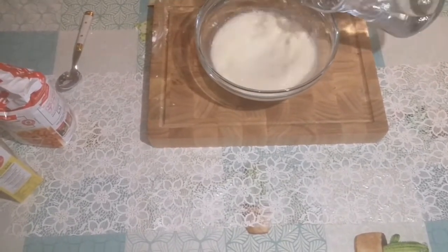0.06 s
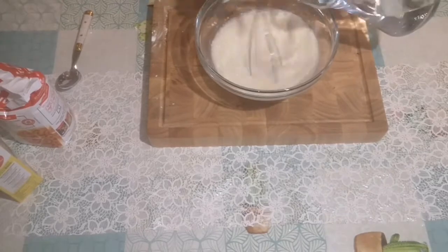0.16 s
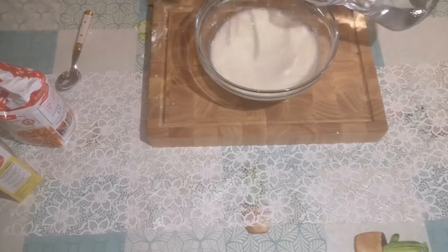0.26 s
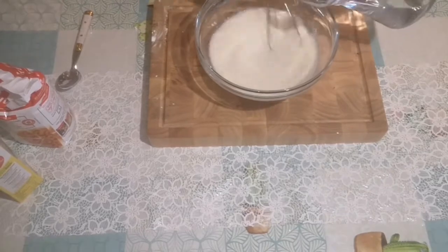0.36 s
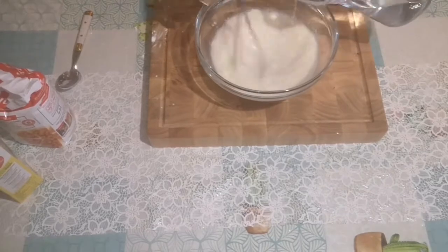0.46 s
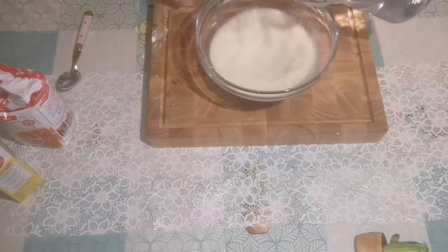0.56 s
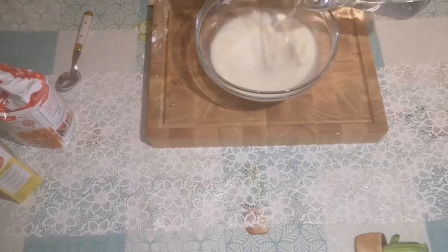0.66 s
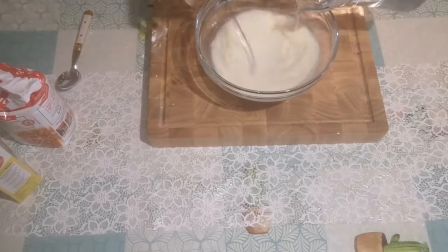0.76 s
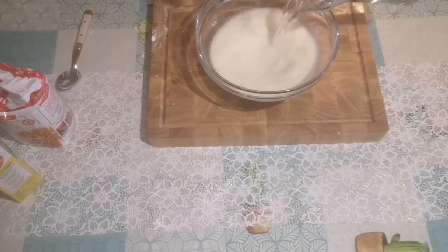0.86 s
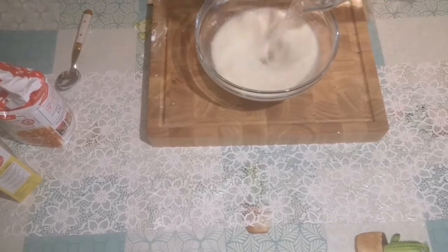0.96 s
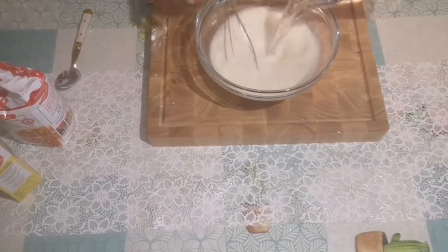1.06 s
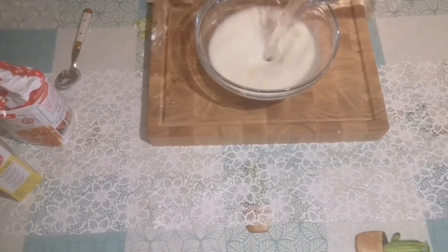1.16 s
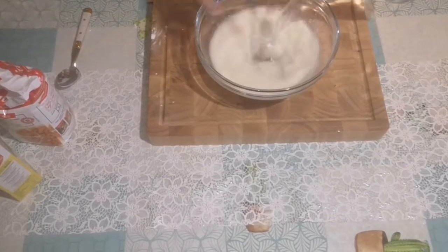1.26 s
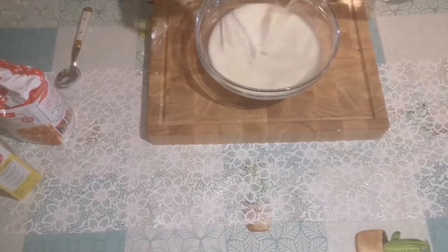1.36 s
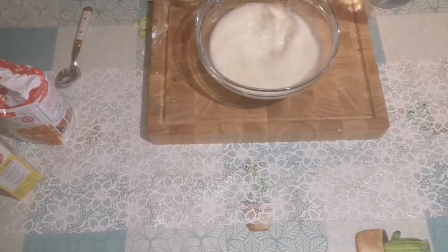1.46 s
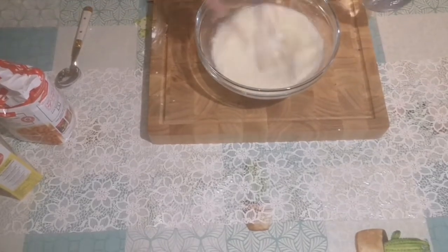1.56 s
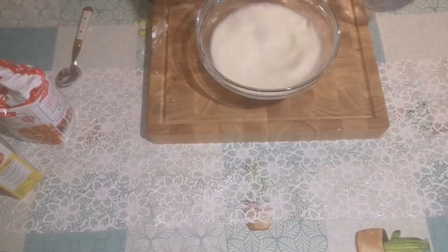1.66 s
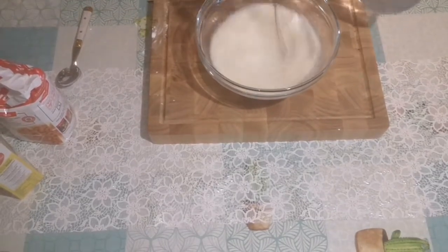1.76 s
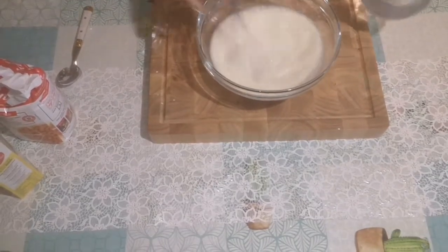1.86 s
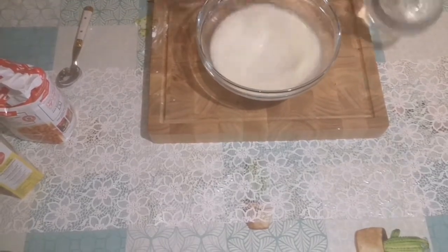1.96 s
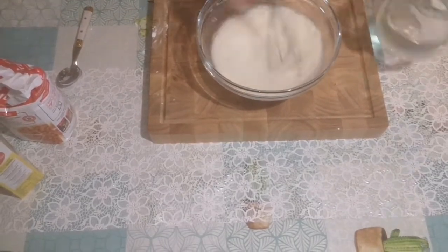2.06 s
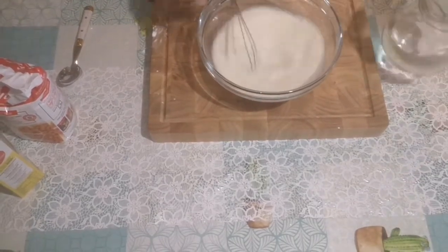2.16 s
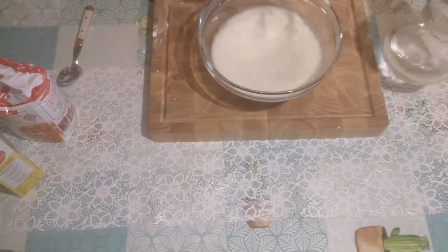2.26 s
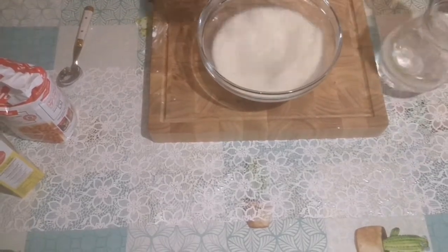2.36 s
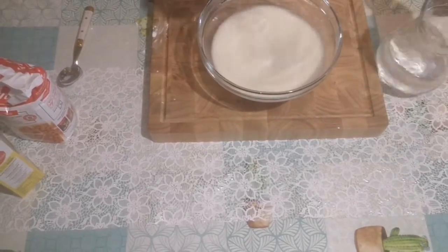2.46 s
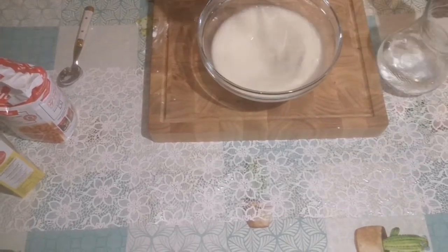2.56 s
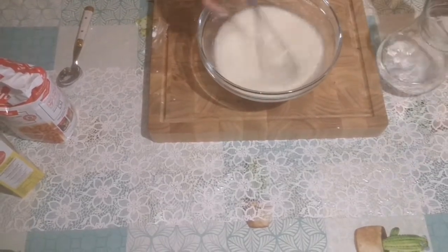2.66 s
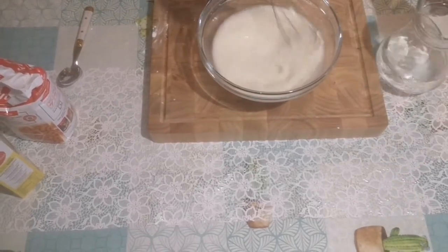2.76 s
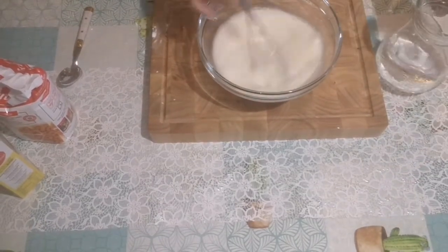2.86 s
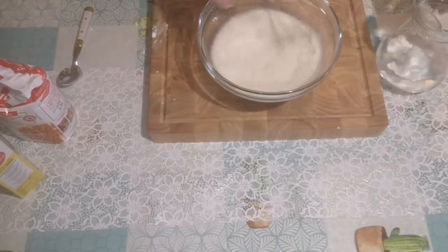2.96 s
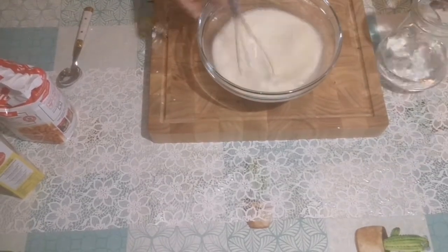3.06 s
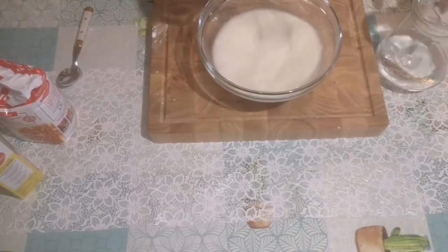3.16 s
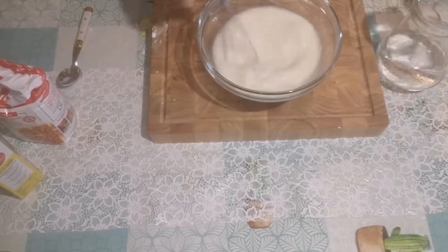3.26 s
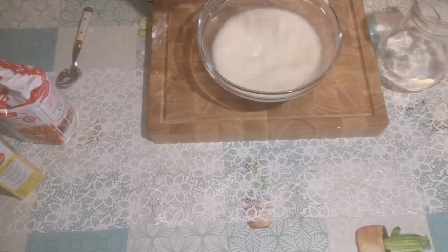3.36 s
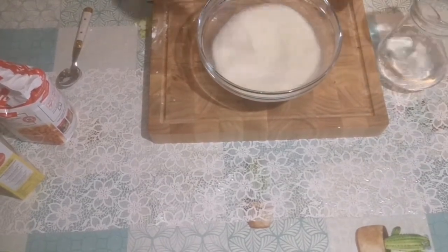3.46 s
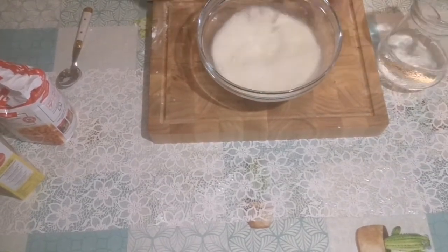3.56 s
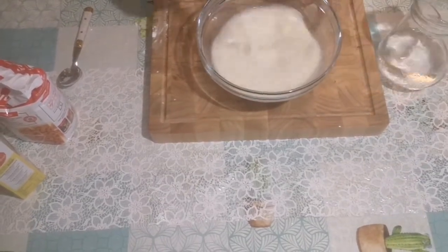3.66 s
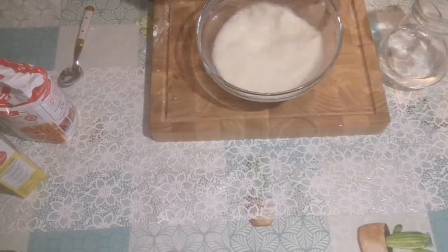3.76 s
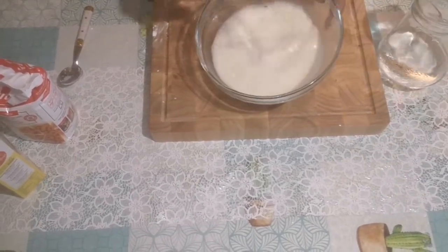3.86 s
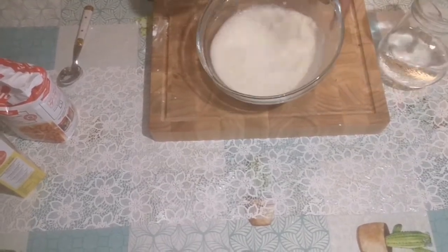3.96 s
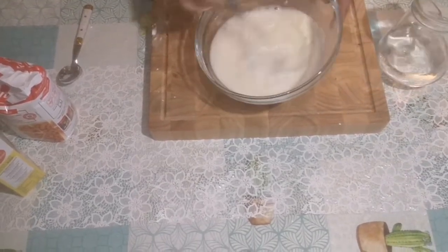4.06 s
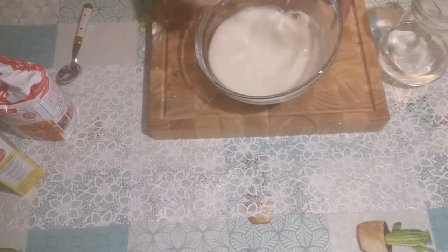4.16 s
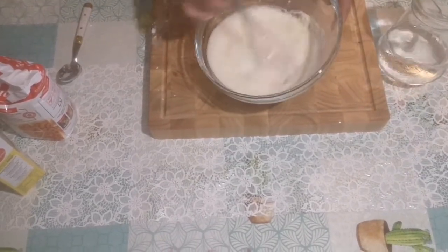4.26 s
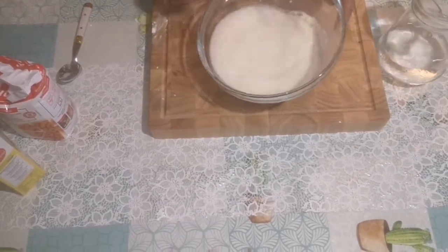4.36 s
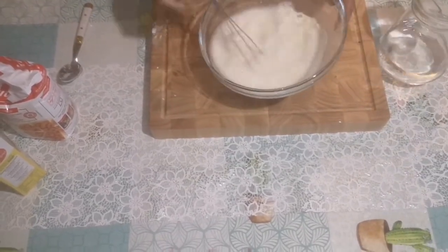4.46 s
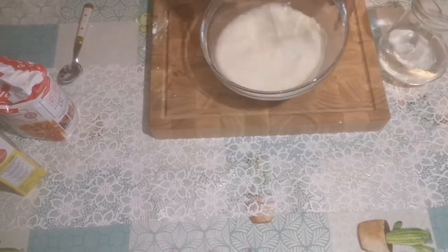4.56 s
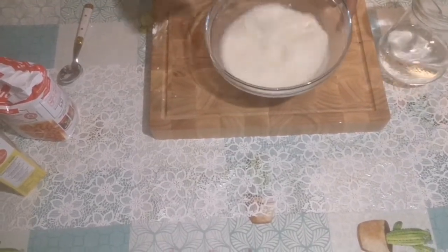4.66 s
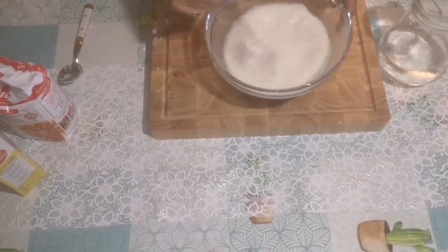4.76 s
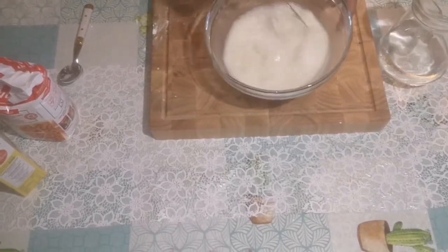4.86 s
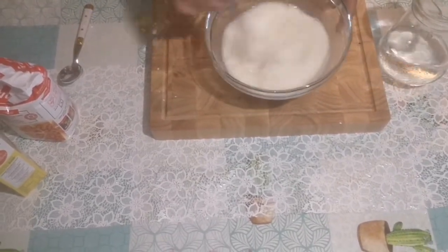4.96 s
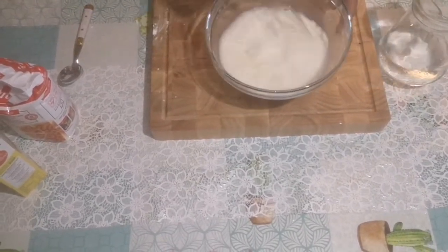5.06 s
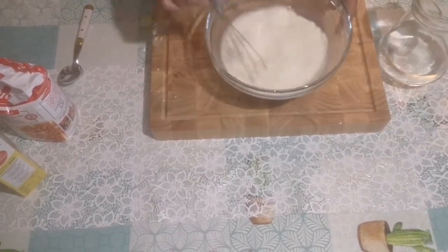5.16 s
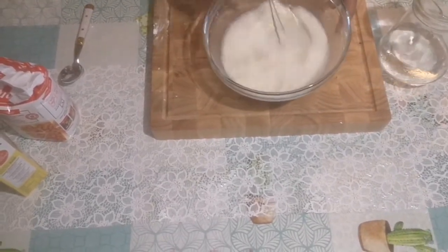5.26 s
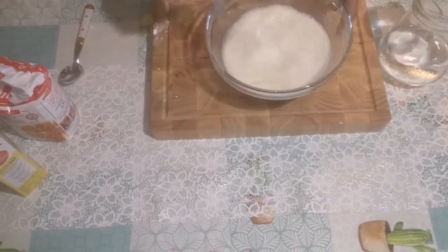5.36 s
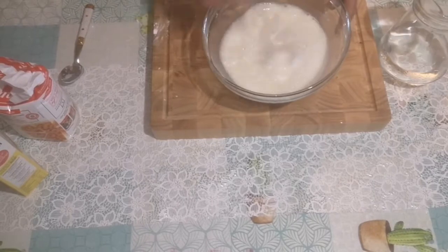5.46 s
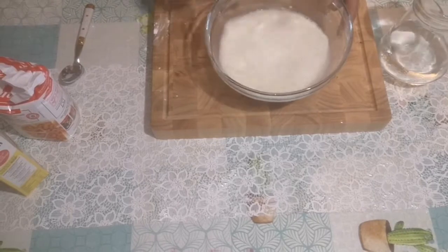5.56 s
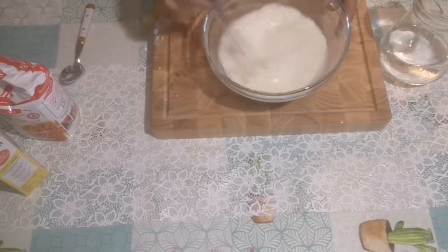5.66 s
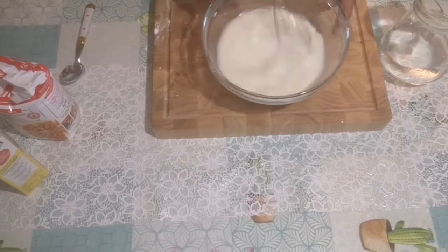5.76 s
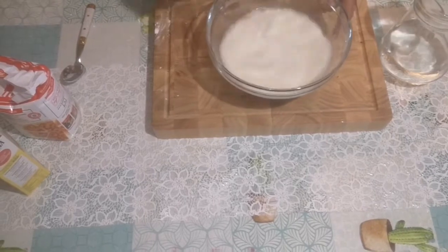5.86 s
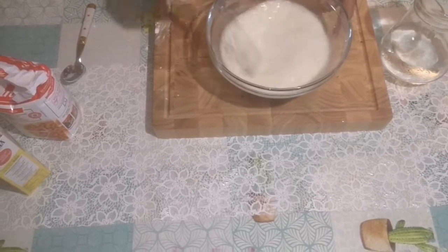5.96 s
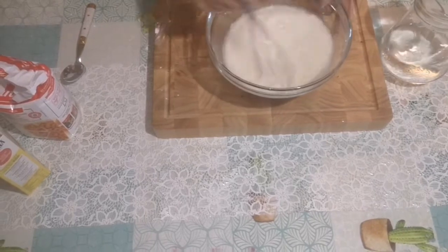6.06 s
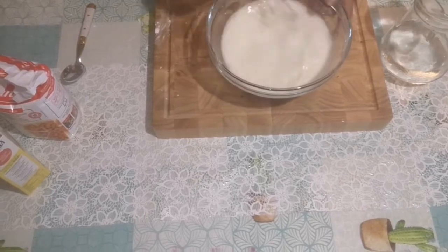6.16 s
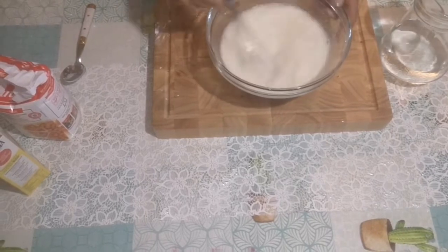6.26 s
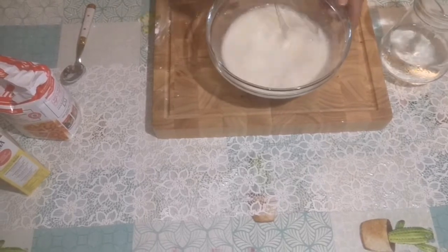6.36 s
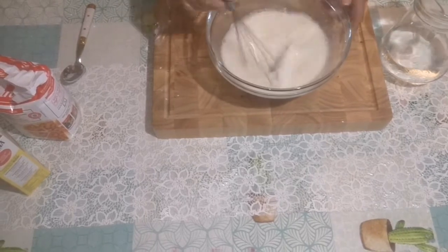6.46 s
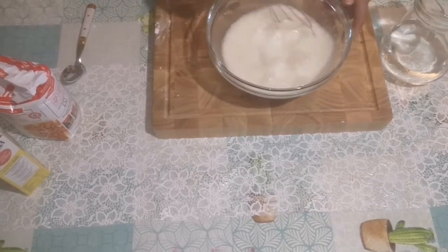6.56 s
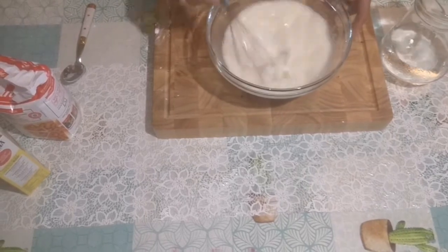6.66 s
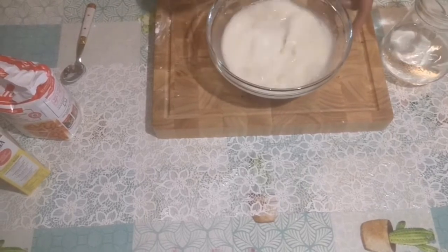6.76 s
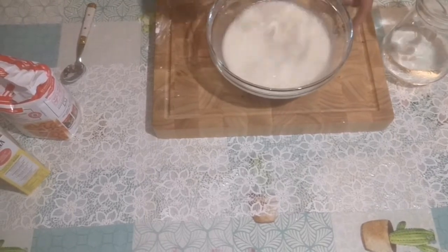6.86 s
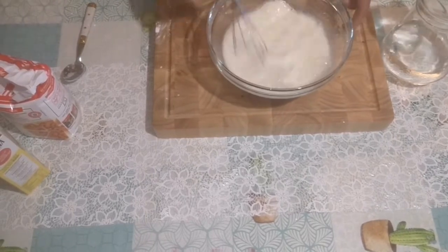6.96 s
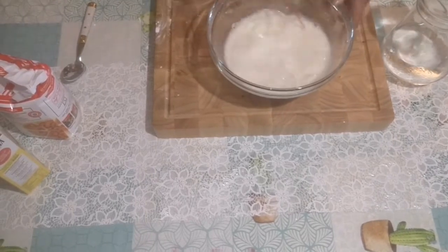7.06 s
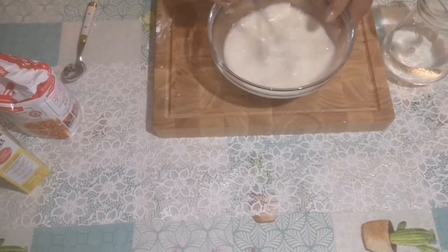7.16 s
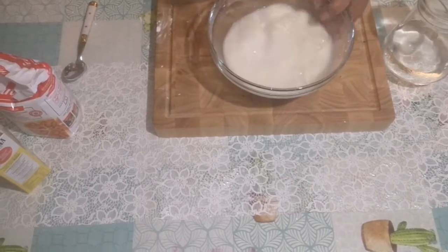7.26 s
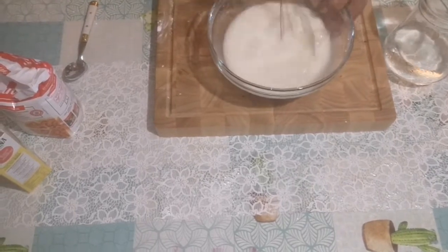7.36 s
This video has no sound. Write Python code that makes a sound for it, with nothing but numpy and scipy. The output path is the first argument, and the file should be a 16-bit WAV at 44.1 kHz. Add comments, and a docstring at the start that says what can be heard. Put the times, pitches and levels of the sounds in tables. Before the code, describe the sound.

Close up in a quiet kitchen, a steel whisk starts softly against a glass bowl, then liquid is poured and the batter sloshes. A jug lands on the table with a double boom. Stirring grows into brisk bright slaps, froth and plops; a clattering board knock follows a lull, then the whisking becomes vigorous. A phone on the table picks up the low thumps and a faint hum.

```python
"""Whisking batter in a glass bowl

Wires scrape, sing and slap on glass: gritty noise under stroke envelopes, with ringing modes.
Poured water and batter slosh, froth and plop as noise and short gliding sines, as does a handle knock.
The whisk clinks on a jug and rings the rim; the jug is set down and the bowl knocked on a wooden board,
as struck modes and clatter. A phone on the table hears the thumps, over a quiet kitchen with a faint hum."""
import sys
import numpy as np
from scipy import signal
from scipy.fft import rfft, irfft, next_fast_len
from scipy.io import wavfile
from scipy.ndimage import uniform_filter1d

SR = 44100
rng = np.random.default_rng(int(sys.argv[2]) if len(sys.argv) > 2 else 0)


def master_out(mix):
    """Clip the mix to full scale and print it as 16-bit PCM to the path in sys.argv[1]."""
    frames = np.transpose(np.atleast_2d(mix))
    ceiling = np.clip(frames, -1, 1)
    pcm = np.round(ceiling * 32767).astype(np.int16)
    wavfile.write(sys.argv[1], SR, pcm)


N = 327214

# whisk sweeping round the bowl: crest_s, scrape_db, slosh_minus_scrape_db, fall_s (to -60 dB)
SWEEPS = [(0.01, -44.5, -1, .12), (0.066, -45.5, 3, .21), (0.24, -51, 4, 0.5), (0.352, -57, 2.5, 0.2),
          (0.89, -44, 8, .3), (1.057, -39, 4.5, .15), (1.19, -37.5, 2, 0.4), (1.342, -38, 3, 0.15),
          (1.505, -38, -2, 0.2), (1.648, -45, 3.5, 0.4), (1.81, -42, -1, .12), (1.935, -44, 2, .12),
          (2.062, -37, -2.5, 0.2), (2.205, -39, 0.5, 0.1), (2.463, -35, -11, 0.5), (2.615, -39, 6, 0.3),
          (2.815, -48.5, 7.5, .6), (3.015, -37, 2.5, .32), (3.125, -48, 6, .3), (3.235, -40, 3.5, 0.6),
          (3.4, -38.5, 3, 0.5), (3.61, -35.5, -2, 0.27), (3.855, -31.5, 1, 0.07), (3.931, -43, 8, .11),
          (4.044, -37, 4.5, 0.36), (4.225, -40, 4, .3), (4.369, -46, 9.5, 0.2), (4.47, -47, 7, .2),
          (4.622, -36.5, 4, 0.3), (4.702, -44, 4, .3), (4.859, -40, 0, .26), (4.941, -44, 5.5, .19),
          (5.175, -42.5, 4, .14), (5.345, -42, -1.5, 0.2), (5.66, -52, 6, 0.5), (6.048, -33.5, 0.5, 0.3),
          (6.17, -46, 6, .3), (6.278, -33, 1.5, 0.16), (6.488, -29.5, 0, .09), (6.57, -37, 3, .12),
          (6.685, -33.5, 5.5, 0.2), (6.786, -37.5, -0.5, 0.1), (6.822, -31, 1, 0.3), (6.949, -41, 5.5, 0.6),
          (7.333, -39.5, -0.5, .18)]
# wires slapping the glass, sudden and bright: crest_s, scrape_db, slosh_minus_scrape_db
SLAPS = [(0.515, -43, -5.5), (0.929, -33, -3.5), (1.376, -37.5, 2.5), (1.755, -37.5, -6.5),
         (1.976, -44.5, 3), (2.35, -36.5, -2), (2.952, -37, 0), (3.159, -26, -7), (3.352, -23.5, -6.5),
         (3.528, -44, 9), (3.555, -21, -9), (3.731, -42.5, 6), (3.766, -29.5, -4), (3.968, -36.5, 1.5),
         (4.16, -28, -6.5), (4.403, -46, 9), (5.079, -36.5, -2), (5.396, -36, -1), (5.545, -50, 5.5),
         (5.967, -28.5, -7), (6.202, -24.5, -6.5), (6.359, -34.5, 3), (6.398, -29.5, 1),
         (6.604, -27.5, -2.5), (7.079, -35.5, 2), (7.224, -39, -1.5)]
# poured water and batter swirling on between strokes: time_s, slosh_db
WASH = [(0, -66), (.8, -64), (.86, -45), (1.2, -41), (1.5, -44), (1.6, -57), (2.3, -60), (2.6, -50),
        (3.49, -60), (4.0, -46), (5.2, -51), (5.6, -58), (5.95, -62), (6.4, -46), (7.42, -60)]
# colour of the bright rasp: freq_hz, level_db
SCRAPE = [(2000, -28), (3700, 2), (7000, 7.5), (10300, -17.5), (14600, -12.5), (16000, -67)]
# colour of the wet rattle: freq_hz, level_db
SLOSH = [(300, -36.5), (600, -18), (770, -11), (950, -11), (1420, -0.5), (3400, 0.5), (4700, -5),
         (5800, -5.5), (8000, -42.5)]
# singing modes of the whisk wires: pitch_hz, level_db
WIRES = [(3820, -6), (5500, -1.5), (5850, 3.5), (6390, -6), (6870, -2.5), (7550, -3), (9170, -18)]
# hollows of the filled bowl: pitch_hz, level_db
FILLED = [(1200, 0.5), (1420, 0), (1800, 1), (2560, 1.5), (3300, -5.5)]
# deepest hollow, which sounds more as batter climbs the wall: time_s, level_db
HOLLOW_LEVEL = [(.8, -72), (.88, -57), (1.3, -54), (1.7, -70), (2.5, -64), (3.6, -54), (5.3, -54),
                (5.7, -62), (6.6, -50), (7.42, -60)]
# how hard the stirring arm loads the table: time_s, level_db
LOAD = [(0, -60), (.8, -70.5), (1.0, -55), (1.45, -51), (1.65, -58), (2.05, -50.5), (2.3, -68),
        (2.7, -56.5), (3.0, -50), (3.6, -54.5), (4.2, -53), (4.5, -56), (5.2, -51.5), (5.7, -64),
        (6.0, -47.5), (6.9, -52.5), (7.42, -60)]
# modes of the table, lowest first: pitch_hz, level_db, t60_s (after a knock)
TABLE = [(32.4, -8.5, 0.69), (57.2, -19, 1), (94.1, 1, 0.47), (125, -1, 0.26), (158.4, -9, 0.38),
         (198, -1, 0.13), (265, -2.5, 0.17), (297.7, -6, 0.36), (357.7, -8.5, 0.41)]
# room tone colour: freq_hz, level_db
KITCHEN = [(20, 6.5), (110, 0), (200, -12.5), (390, -3), (510, -18.5), (700, -43), (1350, -12), (2600, -11),
           (7300, -20), (15000, -58)]
# kitchen hum: pitch_hz, t60_s, level_db
HUM = (372, 0.15, -66)
# air pockets in the batter, and near 6.6 s the whisk handle knocking: start_s, level_db, pitch_hz
POPS = [(0.515, -38, 1264), (0.661, -38.5, 1280), (2.182, -29, 1836), (2.338, -30.5, 2130),
        (2.614, -27, 780), (3.157, -25, 1430), (3.522, -27, 1610), (3.759, -24, 2260), (3.839, -29, 1220),
        (3.85, -21, 2590), (3.906, -32, 1980), (3.93, -31, 784), (4.032, -28, 2510), (4.058, -28, 2800),
        (4.397, -19, 1363), (4.884, -29.5, 780), (5.051, -32, 1126), (5.075, -24, 1360), (5.113, -32, 790),
        (6.263, -27, 860), (6.358, -25, 1890), (6.407, -30, 800), (6.464, -29.5, 790), (6.485, -28, 2350),
        (6.548, -31, 775), (6.6045, -10, 1660), (6.6105, -11, 1450), (6.622, -20, 1503), (6.661, -30, 805),
        (6.686, -23, 1250), (6.807, -32, 830), (6.849, -32, 740), (7.074, -32.5, 737), (7.3, -31.5, 1190)]
# one wire alone on dry glass: start_s, level_db
TICKS = [(0.8935, -27), (0.9239, -22.5), (1.0854, -29), (1.1382, -26), (4.339, -27)]
# whisk touching the jug: start_s, level_db
CLINK = [(1.3683, -26)]
# modes of the jug: pitch_hz, level_db, t60_s
JUG = [(2920, 3.5, 0.1), (2992, 0, 0.28), (3020, -4, 0.42), (3180, 0, .1)]
# blows on the table top: start_s, level_db, clatter_db (against the blow), clatter_t60_s
KNOCKS = [(2.338, -36, -7, .1), (2.378, -9.5, 0, 0.34), (2.41, -33, 0, 0.24), (2.468, -13.5, -18, 0.36),
          (5.747, -40, 6, 0.22), (5.7705, -14, 8, 0.16), (5.806, -14, 14.5, 0.26)]
# colour of things rattling on the table: freq_hz, level_db
CLATTER = [(200, -13), (370, -4), (520, -12), (780, -3), (1100, 1), (2500, -6), (4000, -16), (9000, -55)]
# modes of the wooden board: pitch_hz, level_db, t60_s
BOARD = [(821, -7, 0.14), (1155, -5, 0.072), (1420, -8, 0.11), (1790, -2, 0.1)]
# wires catching the bare rim: start_s, level_db
RINGS = [(3.1537, -35), (3.5508, -43), (4.1544, -42), (5.9634, -34), (5.9738, -25.5), (6.3944, -39),
         (6.485, -38)]
# modes of the glass bowl: pitch_hz, level_db, t60_s
BOWL = [(1243, -14, .25), (2298, -4.5, .46), (2302, -12, .5), (3555, -9, .3), (3607, -6, .3),
        (4975, -7, .3), (6576, -5, .2)]
# colour of the left microphone against the right: freq_hz, level_db
LEFT_PORT = [(300, -2.5), (1300, -2), (2400, 0.5), (3600, -7.5), (5000, -13.5), (6500, -10.5), (8000, -1),
             (10000, 7), (14000, -5)]
# colour of the left-right difference: freq_hz, level_db
WIDTH = [(300, -5), (550, 5), (1100, -3), (5000, -0.5), (12000, -3.5)]

# strokes: swells and falls are times for 60 dB
CREST_S, SWEEP_SWELL_S, SHORTEST_FALL_S = 0.006, 0.24, 0.11  # the crest reaches this far to each side
SLAP_SWELL_S, SLAP_SWELL_S_PER_DB = 0.013, 0.0015  # batter cushions a wet slap
SLAP_FALL_S, SLAP_FALL_S_PER_DB = 0.25, 0.08  # at -40 dB; from a harder slap the wires bounce off sooner
WASH_SCRAPE_DB = -10  # bright part of the swirl against its slosh
WIRE_RING_DB, WIRE_T60_S = -3, 0.093  # after a slap, against its scrape
# froth: pitch lies within +- octaves and deepens from start to end as the batter loosens
BUBBLES_PER_S, BUBBLE_HZ, BUBBLE_OCTAVES, BUBBLE_SINK_OCTAVES = 190, 2199, 1.046, 0.9
BUBBLE_DB, BUBBLE_T60_S = 3, 0.034  # largest bubble against the slosh; t60 at BUBBLE_HZ
HOLLOW_HZ, HOLLOW_T60_S = 794, 0.035
WANDER_S = 0.001494  # time shift per unit of the random walk, as the batter moves
POP_CYCLES, POP_TAIL_DB, POP_TAIL_T60_S = 23.4, -11, 0.089  # cycles to die by 60 dB; then the rough tail
CRACK_DB, CRACK_T60_S = -1, 0.043  # first contact of a knock
KITCHEN_DB = -60
ROOM_T60_S, ROOM_DB = 0.15, -7  # reflections against the direct sound
SPREAD = 0.59  # radians: how differently the microphones weigh near and far contacts
RIGHT_LAG = 2  # samples
TOP_HZ = 15700
SIDES = np.array([[1], [-1]])  # opposite signs left and right


def undb(db):
    """Decibels to amplitude."""
    return np.exp(np.asarray(db) * (np.log(10) / 20))


def unit(x):
    """Scale to an RMS of 1."""
    return x / np.sqrt(np.mean(x ** 2))


def curve(points):
    """Joins (time_s, level_db) points by ramps."""
    return np.interp(np.arange(N) / SR, *np.transpose(points))


def colour(x, points, size=2048):
    """Causal filter through (freq_hz, level_db) points, from the folded cepstrum."""
    hz, db = np.transpose(points)
    grid = np.maximum(np.arange(size // 2 + 1) * SR / size, 1)
    cep = irfft(np.log(undb(np.interp(np.log(grid), np.log(hz), db))))
    cep[1:size // 2] *= 2
    cep[size // 2 + 1:] = 0
    return signal.oaconvolve(x, irfft(np.exp(rfft(cep))))[:len(x)]


def ring(x, hz, t60):
    """One decaying mode; a unit impulse rings with amplitude near 1."""
    r, w = np.exp(-np.log(1000) / (t60 * SR)), 2 * np.pi * hz / SR
    return signal.lfilter([0, r * np.sin(w)], [1, -2 * r * np.cos(w), r * r], x)


def walk(rate):
    """Random levels about every 1 / rate s, joined by ramps; spread near 1."""
    count = int(N * rate / SR) + 2
    levels = np.clip(rng.standard_normal(count), -2, 2)
    return 1.25 * np.interp(np.arange(N), np.linspace(0, N, count), levels)


def grit(spread_db, flicker_db, rate):
    """Dense contacts of very unequal size that come in clusters."""
    level_db = spread_db * rng.exponential(size=N) + flicker_db * walk(rate)
    return unit(rng.standard_normal(N) * undb(level_db))


def rubbed(env, points, spread_db, flicker_db, rate):
    """Gritty contact under an envelope, heard through a broad colour."""
    contact = env * grit(spread_db, flicker_db, rate)
    out = colour(contact, points)
    return out * np.std(contact) / np.std(out)


def singing(env, modes, t60, rate):
    """Each mode is caught on and off by the moving wires and sounds briefly."""
    touch = env * rng.standard_normal(N)
    out = sum(ring(touch * undb(db + 5 * walk(rate)), hz, t60) for hz, db in modes)
    return out * np.std(env) / np.std(out)


def bursts(times, peak_db, t60, rise):
    """Envelope that rises at each time and dies away."""
    env, t = np.zeros(N + SR), np.arange(SR // 2) / SR
    for s, db, fall in zip(times, peak_db, t60):
        decay = undb(db - 60 * t / np.clip(fall, .01, .6))
        env[int(s * SR):][:len(t)] += decay * (1 - np.exp(-t / rise))
    return env[:N]


def strike(times, peak_db, modes, scatter_db):
    """Blows on modes; scatter gives each mode another share, as if each blow lands on another spot."""
    share, out = rng.standard_normal((len(times), len(modes))), 0
    for k, (hz, db, t60) in enumerate(modes):
        blows = np.zeros(N)
        blows[(np.asarray(times) * SR).astype(int)] = undb(peak_db + db + scatter_db * share[:, k])
        out = out + ring(blows, hz, t60)
    return out


def both(near, far):
    """Near and far contacts, weighed differently left and right."""
    return np.cos(SPREAD) * near + np.sin(SPREAD) * far * SIDES


def wander(x):
    """Pitch that drifts up and down by a few percent."""
    shift = WANDER_S * SR * uniform_filter1d(walk(25), SR // 50)
    return np.interp(np.arange(N) + shift, np.arange(N), x)


def kitchen():
    """Quiet room tone, uneven and alike on both sides in the bass, with a wavering hum."""
    mid, side = (colour(rng.standard_normal(N), KITCHEN, size=8192) for _ in range(2))
    side = signal.sosfilt(signal.butter(1, 500, "high", fs=SR, output="sos"), side) * 0.78
    hz, t60, db = HUM
    hum = unit(ring(rng.standard_normal(N), hz, t60)) * undb(db + 4.5 * walk(4.74))
    uneven = (undb(3 * walk(5)) - 1) * uniform_filter1d(mid, SR // 1000)  # swells the low part only
    return undb(KITCHEN_DB) / np.std(mid) * (mid + uneven + side * SIDES) + hum


def strokes():
    """Scrape and slosh envelopes: swell, a short crest while wire after wire lands, fall; plus swirl."""
    events = [(s, db, wet, SWEEP_SWELL_S, fall) for s, db, wet, fall in SWEEPS]
    for s, db, wet in SLAPS:
        swell = SLAP_SWELL_S + SLAP_SWELL_S_PER_DB * np.clip(wet + 4, 0, 12)
        events.append((s, db, wet, swell, SLAP_FALL_S - SLAP_FALL_S_PER_DB * (db + 40)))
    power, t = np.zeros((2, N + 2 * SR)), np.arange(-SR // 2, SR // 2) / SR
    for s, db, wet, swell, fall in events:
        before = np.maximum(-t - CREST_S, 0) / np.clip(swell, .01, .6)
        after = np.maximum(t - CREST_S, 0) / np.clip(fall, SHORTEST_FALL_S, .6)
        level_db = np.array([[db], [db + wet]]) - 60 * (before + after)
        power[:, int(s * SR):][:, :SR] += undb(2 * level_db)  # overlapping strokes add as power
    swirl = undb(2 * (curve(WASH) + np.array([[WASH_SCRAPE_DB], [0]])))
    return np.sqrt(power[:, SR // 2:][:, :N] + swirl)


def whisk(bright, dull):
    """Steel on glass: a bright rasp with singing wires, a duller wet rattle and the bowl's hollows."""
    rasp = rubbed(bright, SCRAPE, 1.8, 3.2, 140)
    rattle = undb(-4) * rubbed(dull, SLOSH, 2.3, 3.0, 90)
    wires = undb(-8) * singing(bright, WIRES, .035, 16)
    hollows = undb(-5.0) * wander(singing(dull, FILLED, 0.042, 22))
    return rasp + wires + rattle + hollows


def patchy(x, depth_db, rate):
    """The wires meet other parts of glass and batter, so each half octave swells on its own."""
    size = next_fast_len(N)
    spectrum, octave = rfft(x, size), np.log2(np.arange(1, size // 2 + 2) * SR / size)
    octave = np.clip(octave, 9.5, 13.5)  # log2 of Hz; the end bands take all beyond
    out = 0
    for centre in np.arange(9.5, 14, .5):
        band = np.clip(1 - 2 * np.abs(octave - centre), 0, 1)
        out = out + irfft(spectrum * band, size)[:, :N] * undb(depth_db * walk(rate))
    return out


def froth(dull):
    """Many small bubbles of chance pitch, glide and size, as loud as the batter sloshes."""
    out, t = np.zeros(N + SR), np.arange(SR // 32) / SR
    chances = rng.random((2000, 4))[:int(BUBBLES_PER_S * N / SR)]
    for when, pitch, size, glide in chances:
        i = int(when * N)
        octaves = BUBBLE_OCTAVES * (2 * pitch - 1) - BUBBLE_SINK_OCTAVES * (when - .5)
        hz = BUBBLE_HZ * 2 ** octaves
        # higher bubbles die sooner
        fade = undb(BUBBLE_DB - 12.5 * size - 60 * t / BUBBLE_T60_S * hz / BUBBLE_HZ)
        fade *= 1 - np.exp(-t / 0.00048)
        tone = np.sin(2 * np.pi * hz * t * (1 + 14 * (glide - .5) * t))
        out[i:i + len(t)] += dull[i] * fade * tone
    return out[:N]


def hollow(shove):
    """Each stroke sloshes batter in the deepest hollow of the bowl, a twice-resonated grit."""
    env = shove * undb(curve(HOLLOW_LEVEL))
    once = ring(env * grit(3.1, 4.3, 40), HOLLOW_HZ, HOLLOW_T60_S)
    out = ring(once, HOLLOW_HZ, HOLLOW_T60_S)
    return wander(out * np.std(env) / np.std(out))


def table_shake(force):
    """Each stroke shoves the bowl, and the table answers in its modes, damped more than by a knock."""
    push = force * rng.standard_normal(N)
    out = sum(undb(db) * ring(push, hz, 0.41 * t60) for hz, db, t60 in TABLE)
    return out * np.std(push) / np.std(out)


def twang():
    """Each slap sets the wires ringing for a moment."""
    s, db, _ = np.transpose(SLAPS)
    modes = [(hz, level_db, WIRE_T60_S) for hz, level_db in WIRES]
    return strike(s - CREST_S / 2, db + WIRE_RING_DB, modes, 4.1)


def plops_and_handle():
    """Air pockets and the handle knock: a few cycles that glide up and die, then a rough tail."""
    out = np.zeros(N + SR)
    t = np.arange(SR // 5) / SR
    wobble = np.cumsum(rng.standard_normal((len(POPS), len(t))), axis=1) * 0.12  # radians
    for (s, db, hz), w in zip(POPS, wobble):
        pop = np.sin(2 * np.pi * hz * t * (1 + 3.1 * t)) * undb(-60 * t * hz / POP_CYCLES)
        tail = np.sin(2 * np.pi * hz * t + w) * undb(POP_TAIL_DB - 60 * t / POP_TAIL_T60_S)
        rise = 1 - np.exp(-t * hz / 0.8)
        out[int(s * SR):][:len(t)] += undb(db + 1.5) * (pop + tail) * rise
    return out[:N] * undb(2.5 * walk(300))


def ticks():
    """One wire on dry glass: a bare click of two modes that die within milliseconds."""
    s, db = np.transpose(TICKS)
    return strike(s, db, [(2670, -0.7, 0.0067), (6150, -3.0, 0.0039)], 0.7)


def jug_clink():
    """The whisk touches the jug, which rings in its modes."""
    return strike(*np.transpose(CLINK), JUG, 0) * undb(-6.0)


def knocks():
    """Heavy glass lands: the table booms, the board cracks and rings, and everything on it clatters."""
    s, db, clatter_db, t60 = np.transpose(KNOCKS)
    deep = strike(s + 0.0011, db - 10.0, TABLE[2:4], 0.88)
    # a soft blow with little clatter hardly reaches the upper modes, but sways the whole table
    upper = strike(s + .001, db - 6.5 + np.minimum(clatter_db, 0) / 2, TABLE[4:], 1.9)
    sway = strike(s, db - 12.5 - 0.3 * np.clip(clatter_db, -20, 0), TABLE[:2], 0.6)
    top = signal.sosfilt(signal.butter(2, 65, "high", fs=SR, output="sos"), deep + upper)
    # the cloth spreads the blow over about two milliseconds
    boom = uniform_filter1d(top + sway, int(0.0018 * SR))
    shake = bursts(s, db + clatter_db - 15.5, t60, 0.0021)
    # blows with more clatter crack more
    crack_db = db + 1.4 * clatter_db - 17.5 + CRACK_DB
    shake += bursts(s, crack_db, 0 * s + CRACK_T60_S, 0.0006)

    def board_side():
        """Clatter and board ring as one set of contacts."""
        return rubbed(shake, CLATTER, 1.1, 2.1, 80) + strike(s, db + clatter_db - 20.0, BOARD, 4.4)

    return boom, both(board_side(), board_side())


def rim_rings():
    """Wires catch the bare rim and the glass bowl rings in its modes."""
    return strike(*np.transpose(RINGS), BOWL, 1) * undb(-0.5)


def room(x):
    """Direct sound plus reflections that differ at the two microphones."""
    t = np.arange(SR // 3) / SR
    tail = rng.standard_normal((2, len(t))) * undb(-60 * t / ROOM_T60_S) * (t > .001)
    tail *= undb(ROOM_DB) / np.sqrt(np.sum(tail ** 2, axis=1, keepdims=True))
    tail[:, 0] += 1
    return signal.oaconvolve(x, tail, axes=1)[:, :N] / np.hypot(1, undb(ROOM_DB))


def microphones(left, right):
    """Two unlike ports: the left is coloured, the right lags, and their difference is coloured too."""
    air = np.array([colour(left, LEFT_PORT), np.roll(right, RIGHT_LAG)])
    return air.mean(axis=0) + colour((air[0] - air[1]) / 2, WIDTH) * SIDES


def scene():
    """Stirring and knocks through the air and the table, over the kitchen."""
    bright, dull = strokes()
    # slosh against its half-second average: the push of each stroke
    shove = (dull / (uniform_filter1d(dull, SR // 2) + 1e-5)) ** 0.79
    table = table_shake(shove * undb(curve(LOAD)))
    boom, clatter = knocks()
    stirring = patchy(both(whisk(bright, dull), whisk(bright, dull)), 2.8, 18)
    batter = both(froth(dull), froth(dull)) + hollow(shove)
    wires = both(twang(), twang()) + ticks()
    close = stirring + batter + wires + plops_and_handle() + clatter
    left, right = room(close) + jug_clink() + rim_rings()
    air = microphones(left, right)
    # the table reaches the phone through its stand, almost the same on both sides
    low = boom + table
    tilt = 5.5 * np.gradient(low) * SIDES  # puts the left slightly ahead of the right
    return air + low + tilt + kitchen()


def record(dry):
    """The phone cuts the top."""
    return signal.sosfilt(signal.ellip(10, .2, 80, TOP_HZ, fs=SR, output="sos"), dry)


dry = scene()
out = record(dry)
master_out(out)
```